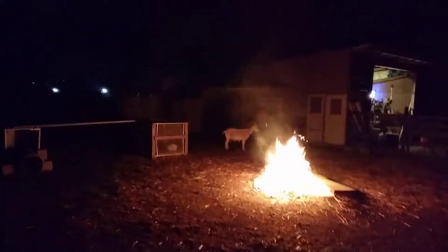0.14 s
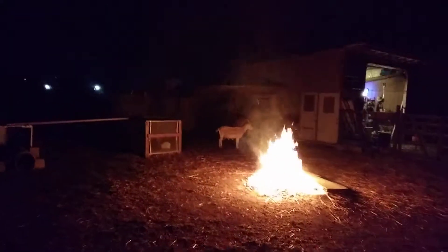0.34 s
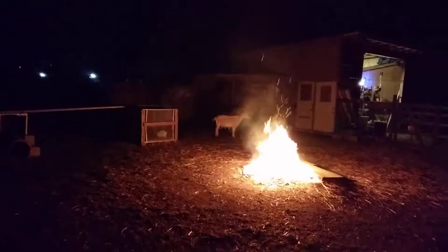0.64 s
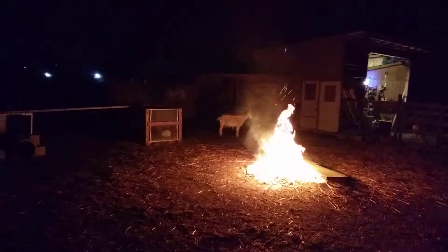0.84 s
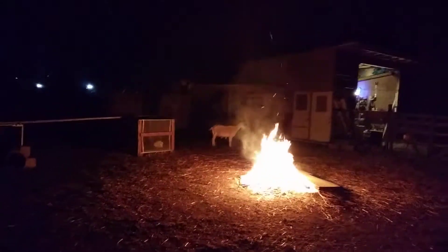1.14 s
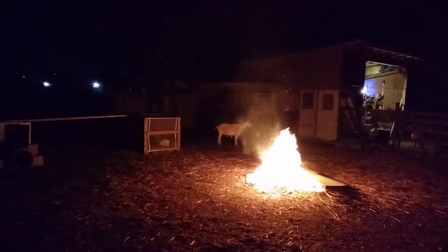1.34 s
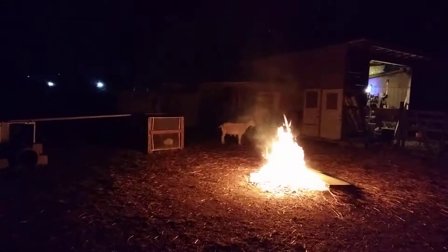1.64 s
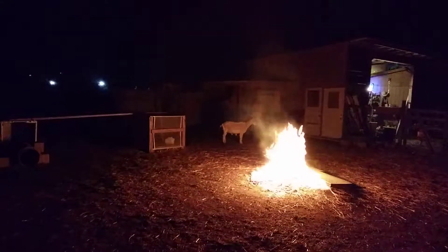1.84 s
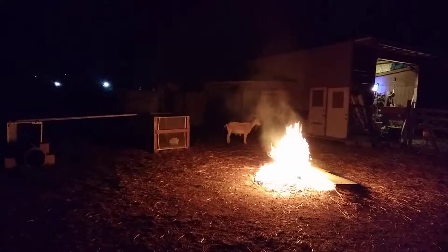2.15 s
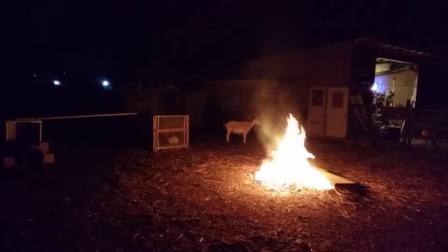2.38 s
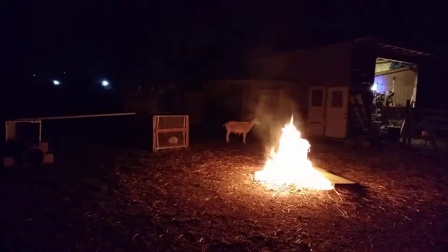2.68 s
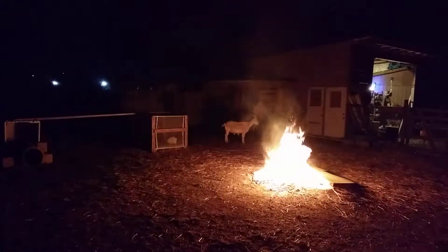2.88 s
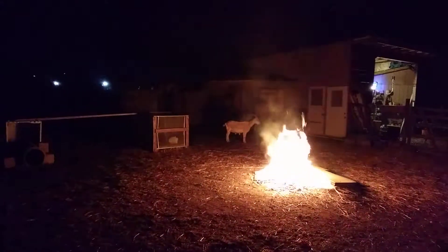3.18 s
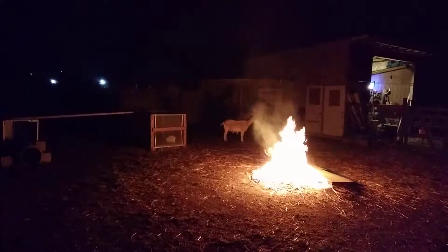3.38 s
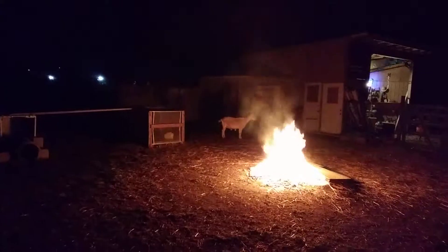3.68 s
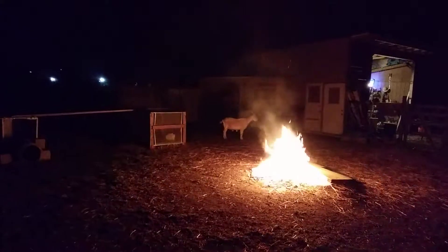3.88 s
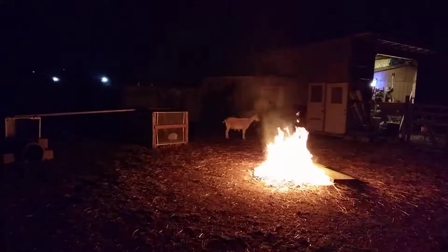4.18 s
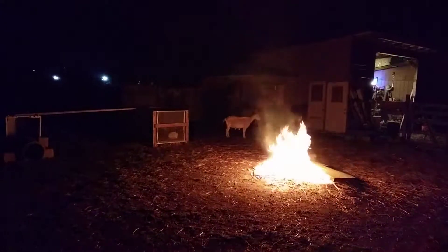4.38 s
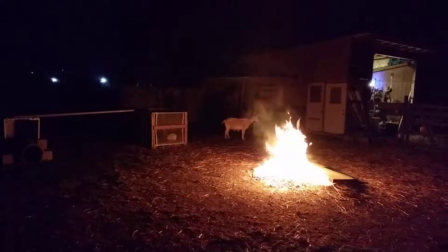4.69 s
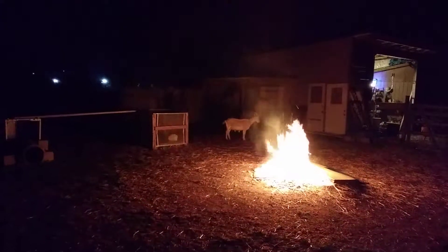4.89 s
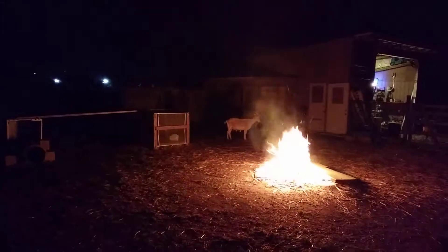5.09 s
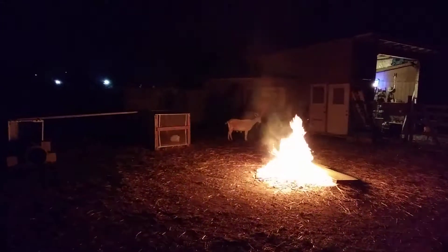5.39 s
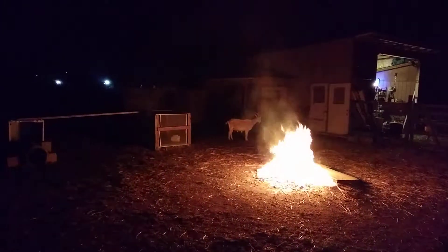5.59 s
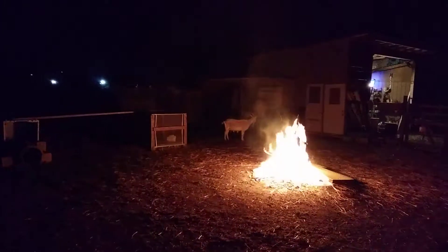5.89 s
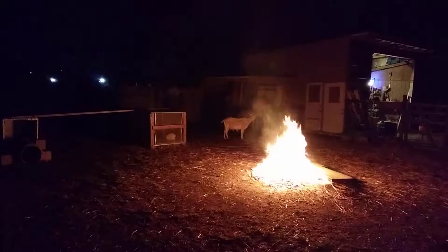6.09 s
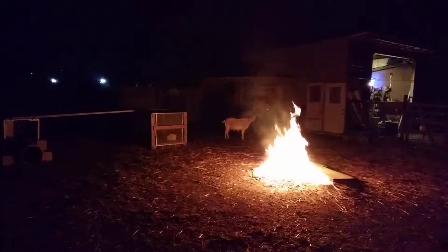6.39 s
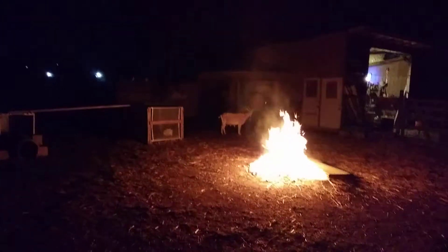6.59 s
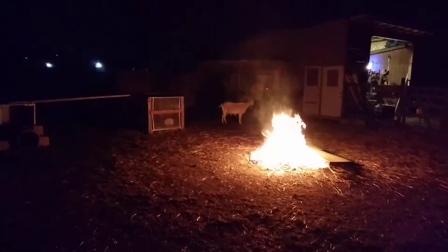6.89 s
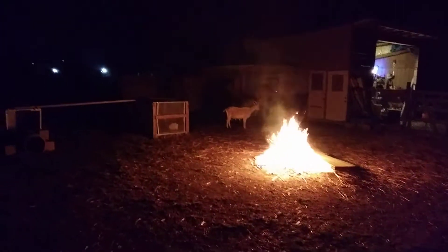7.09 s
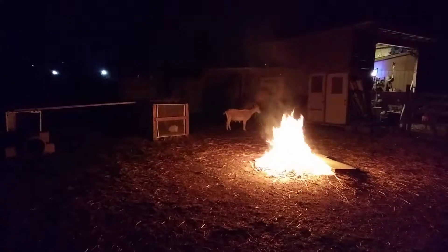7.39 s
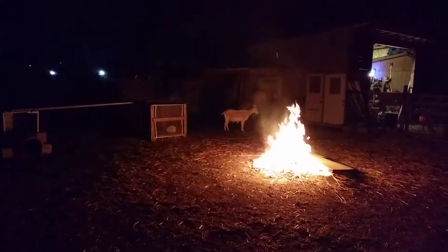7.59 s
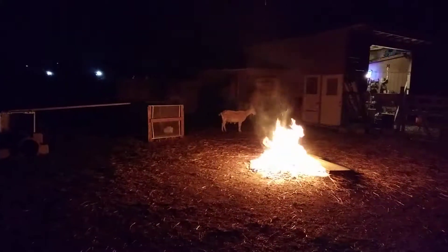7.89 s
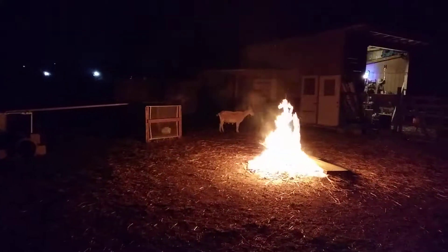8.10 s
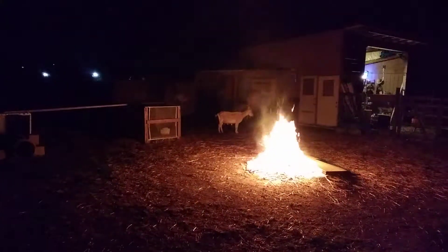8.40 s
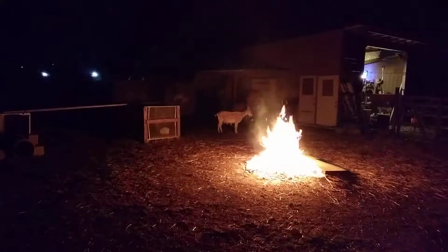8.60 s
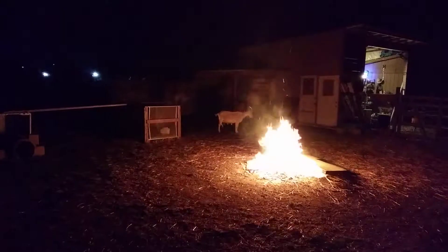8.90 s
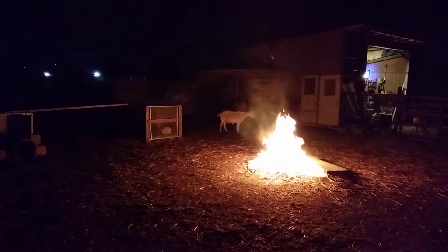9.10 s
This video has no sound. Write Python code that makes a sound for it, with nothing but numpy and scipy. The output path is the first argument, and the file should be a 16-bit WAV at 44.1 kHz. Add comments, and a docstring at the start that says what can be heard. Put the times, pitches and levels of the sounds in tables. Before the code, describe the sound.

A wood bonfire crackles at night with sharp scattered pops, straw scrunching close by at first, crickets chirping steadily and a goat bleating softly once.

```python
"""A wood bonfire at night in a farmyard, some metres from a phone microphone; a soft flame roar, a far road and drone.
From the start straw scrunches close by for a second: dense stalk breaks. Wood pops and ticks (rung noise bursts) go on
throughout, as do one cricket's chirps (sagging tones) before a far chorus (narrow noise). From 2.2 s embers crumble
and, at 2.6 s, sap first whistles (gliding tones); at 5.3 s a goat bleats softly (gliding tones with a faint octave);
the sap whistles again from 6.4 s and the loudest pop comes at 7.75 s."""
import sys
import numpy as np
from scipy import signal
from scipy.fft import rfft, irfft
from scipy.io import wavfile
from scipy.ndimage import uniform_filter1d

SR = 44100
rng = np.random.default_rng(int(sys.argv[2]) if len(sys.argv) > 2 else 0)


def generate_wav(sig):
    """Save sig (samples, or channels by samples) to the path in sys.argv[1] as 16-bit PCM at SR."""
    pcm = np.round(np.clip(np.atleast_2d(sig).T, -1, 1) * 32767).astype(np.int16)
    wavfile.write(sys.argv[1], SR, pcm)


N = 407925

# background levels: (time [s], flame roar level [dB], far road level [dB], wavering drone level [dB])
BACKGROUND_LEVELS = [(0, -62.5, -65, -68), (1.3, -64.5, -69.5, -72.5), (2.001, -67.5, -70.5, -75),
                     (2.6, -65.5, -68.5, -77.5), (3, -66.5, -71, -63.5), (3.5, -68, -70, -71.5),
                     (4.2, -67, -68, -72), (4.8, -66.5, -68, -74), (5.2, -64.5, -65.5, -75),
                     (5.8, -66, -66.5, -69), (6.299, -65.5, -63.5, -66.5), (6.8, -65.5, -61, -62.5),
                     (7.298, -67.5, -60.5, -72), (7.799, -66, -58, -66), (8.3, -66.5, -62, -70),
                     (8.8, -66, -62.5, -72), (9.25, -67, -62.5, -73)]
# colour of the flame noise: (frequency [Hz], relative level per Hz [dB])
FLAME_COLOUR = [(15, -66), (25, -48), (128, -21.5), (167, -13.5), (349, -2.5), (445, -5.5), (651, 3.5),
                (927, -4), (1220, -14), (1930, -7), (3410, -17), (4600, -10.5), (5270, -16), (15200, -20),
                (16500, -25)]
# resonances of the far road: (centre [Hz], width [Hz], relative level [dB])
ROAD_MODES = [(721, 93, -7), (1235, 405, 1.5), (1765, 235, -6.5)]
# resonances of the drone: (centre [Hz], width [Hz], relative level [dB])
DRONE_MODES = [(1032, 121, -1.5), (2156, 280, -5.5), (2700, 510, -11.5)]
# far crickets: (centre [Hz], width [Hz], level [dB])
CHORUS_MODES = [(4184, 180, -80), (4870, 430, -86.5)]
# near cricket: (first wing stroke [s], first to last stroke [s], base level [dB])
CRICKET_CHIRPS = [(.203, .13, -68), (.579, .13, -68), (.942, 0.13, -64), (1.311, .136, -66.5),
                  (1.697, 0.12, -66.5), (2.059, .132, -66), (2.431, .14, -63), (2.809, .132, -64),
                  (3.168, .136, -64.5), (3.536, .128, -66.5), (3.893, 0.13, -67), (4.334, .138, -63.5),
                  (4.713, 0.13, -63.5), (5.126, .142, -62.5), (5.541, .134, -63), (5.906, .132, -63),
                  (6.235, .122, -66), (6.601, .132, -66), (6.977, .132, -62), (7.352, 0.13, -63.5),
                  (7.782, .132, -60), (8.15, 0.14, -62), (8.572, 0.13, -64.5), (9.151, .132, -62)]
# goat syllables: (start [s], length [s], first pitch [Hz], last pitch [Hz], level [dB])
GOAT_SYLLABLES = [(5.283, .07, 718, 735, -58), (5.405, 0.054, 728, 710, -58),
                  (5.512, 0.054, 750, 730, -50.5), (5.556, 0.06, 735, 786, -54),
                  (5.665, 0.06, 753, 677, -52), (5.74, 0.07, 733, 720, -54),
                  (5.805, 0.058, 730, 715, -50.5), (5.855, 0.058, 710, 660, -54.5)]
# sap whistling out of a log: (start [s], length [s], first pitch [Hz], last pitch [Hz], level [dB])
SAP_WHISTLES = [(2.62, .08, 7950, 7050, -81), (2.73, .13, 7450, 7900, -79), (6.375, .185, 7350, 8050, -76),
                (6.645, 0.17, 10700, 11700, -80), (6.86, .045, 9900, 10000, -77),
                (6.905, .115, 10000, 7150, -77)]
# thump, knock, snap and fizz of a crunch: (nominal low edge [Hz], nominal high edge [Hz])
CRUNCH_BANDS = [(400, 1500), (1500, 4300), (4300, 9000), (9000, 15500)]
# straw close by, one list per scrunch: (time [s], thump level [dB], snap against thump [dB])
STRAW_SCRUNCHES = [
    [(0.12, -54, -9), (0.156, -64, -14), (0.166, -37, -3.5), (0.178, -37, -1), (0.202, -34.5, 6.5),
     (0.246, -50, 1.5), (0.298, -54.5, 1.5), (0.32, -71, -10)],
    [(0.375, -65, -21), (0.381, -58, 4.5), (0.397, -58, 4), (0.445, -43, -3), (0.463, -44.5, 2.5),
     (0.503, -46.5, 6), (0.515, -39, 0)],
    [(0.515, -40, 1.5), (0.557, -26, -12), (0.585, -27, -7), (0.643, -41, -4), (0.691, -42.5, -8),
     (0.697, -48, -14), (0.797, -61, -5), (0.81, -68, -19)],
    [(0.83, -75, -13), (0.838, -51.5, -15), (0.858, -55, -7), (0.874, -50, -13), (0.88, -55, -1.5),
     (0.904, -50.5, -4), (0.936, -58.5, -5), (0.95, -64, 5)],
    [(1.06, -64, -12), (1.078, -50, -4), (1.118, -45.5, -7.5), (1.138, -49, -13), (1.146, -55.5, -10),
     (1.16, -56, -22)],
]
# embers crumbling and settling: (start [s], length [s], thump level [dB], knock against thump [dB],
# snap against thump [dB], fade over the length [dB])
EMBER_FALLS = [(2.196, 0.055, -51.5, -21, -11.5, 7.4), (2.325, 0.023, -47.5, -6.5, -12, 25),
               (2.356, 0.056, -51.5, -17, -14, 14), (2.436, 0.02, -41, -26, -8, 27),
               (2.599, 0.017, -45.5, -15, -6, 25), (2.615, .025, -55.5, -8, -11, 10),
               (4.116, 0.077, -54, -4.5, -5, 14), (5.05, .08, -58, -9, -9, 3),
               (5.75, 0.042, -57.5, -8, -11, 2), (6.82, .026, -36, -9.5, -13.5, 5.4),
               (7.757, 0.01, -27, -12, -14, 24), (7.77, .016, -37.5, 5, 1.5, 9),
               (7.786, .03, -49, 6.5, -7, 6), (7.812, 0.17, -52, 8, -0.5, 28)]
# bursting pockets in the wood: (time [s], thump [Hz], thump peak [dB], knock peak [dB], snap peak [dB],
# sharpness factor)
WOOD_POPS = [(0.1119, 880, -25.5, -24, -48, 0.49), (0.1679, 1240, -14.5, -38, -44, 0.67),
             (0.2002, 1210, -22, -14.5, -29, 0.82), (0.6862, 1120, -24, -21, -21, 0.63),
             (0.821, 990, -40, -60, -48, 1.3), (1.1462, 1410, -40, -31, -29, 0.66),
             (1.2056, 940, -41.5, -52, -65, 0.7), (2.199, 1110, -40, -46, -42, 0.82),
             (2.2148, 1500, -36.5, -54, -53, 0.69), (2.3221, 890, -38, -59, -60, 0.79),
             (2.3275, 990, -45, -57, -49, 1), (2.3579, 1170, -52, -55, -48, 1),
             (2.3677, 1040, -40.5, -48, -59, 0.72), (2.432, 820, -24.5, -58, -44, .8),
             (2.557, 910, -33.5, -46, -41.5, 0.73), (2.5979, 980, -32.5, -50, -44, 0.76),
             (3.3195, 835, -21.5, -22.5, -23.5, 0.73), (3.639, 510, -44.5, -60, -64, 0.89),
             (3.66, 2160, -65, -43, -67, 2.3), (3.715, 610, -46, -68, -71, 0.98),
             (3.826, 765, -38.5, -70, -55, .8), (4.115, 1210, -37.5, -55, -37, 0.45),
             (4.3225, 725, -26.5, -49, -39.5, 0.82), (4.3683, 610, -31.5, -58, -48, 0.69),
             (4.4898, 1750, -40, -40, -33, 0.8), (4.4923, 760, -27.5, -52, -39, 0.57),
             (5.615, 1500, -39, -38, -51, 1.3), (5.753, 1110, -49, -61, -62, 1.2),
             (5.7628, 860, -56, -58, -56, 1.6), (5.778, 1220, -52, -49, -54, 1.3),
             (5.948, 1700, -52, -46.5, -70, 0.98), (6.24, 1610, -54, -47.5, -49, 1.4),
             (6.8189, 1020, -23, -17, -31.5, 0.54), (7.753, 1540, -11.5, -12.5, -21.5, 1.4),
             (7.773, 2150, -25.5, -21.5, -40, 4.8), (7.807, 1700, -50, -32, -55, 2),
             (7.8156, 1720, -48, -29, -45, 1.8), (7.8221, 1900, -35, -27.5, -57, 1.2),
             (7.844, 660, -47, -32.5, -58, 1.4), (8.8577, 460, -70, -36.5, -41.5, 2.45)]
# thin ticks of bark and sparks, without thump: (time [s], snap peak [dB], snap [Hz], knock peak [dB])
BARK_TICKS = [(0.13, -50, 6580, -40), (0.9502, -38.5, 10600, -54), (1.0241, -36.5, 7550, -59),
              (1.3364, -54, 8230, -64), (1.532, -49, 6730, -51), (1.7335, -45, 7000, -63),
              (2.0018, -46, 10500, -54), (2.103, -38, 7900, -66), (2.1913, -37, 7500, -53),
              (2.2832, -48, 8080, -63), (2.4435, -39, 9840, -60), (2.4845, -47, 7540, -61),
              (2.7244, -48, 7470, -69), (2.8574, -46, 7560, -61), (2.8873, -45.5, 7800, -61),
              (3.3957, -46, 7630, -67), (3.6002, -50, 9210, -63), (4.0721, -40.5, 7800, -65),
              (4.122, -39, 6470, -53), (4.172, -36.5, 7430, -47), (4.4248, -44, 7520, -55),
              (4.4374, -44, 6750, -44), (4.507, -46, 7380, -54), (4.5715, -50, 8010, -62),
              (4.7895, -51, 7660, -54), (5.1851, -50, 8000, -63), (5.2107, -49, 10200, -58),
              (5.3787, -46.5, 7340, -58), (5.4736, -45, 7260, -68.5), (5.9359, -52, 6840, -61),
              (6.0273, -51, 6500, -52), (6.639, -45.5, 7640, -64), (6.8447, -36, 11500, -59),
              (7.031, -46, 7890, -55), (7.0522, -42, 7700, -47), (7.137, -48, 6990, -69),
              (7.1881, -50, 10200, -66), (7.341, -40, 10600, -51), (7.3851, -49, 11000, -62),
              (7.5832, -41.5, 7350, -53), (7.6141, -41, 7500, -69), (8.1494, -43, 9540, -54),
              (8.1798, -50, 8330, -60), (8.243, -42, 7200, -58), (8.2816, -48, 7540, -62),
              (8.4173, -54, 7110, -69), (8.8172, -43, 6840, -50), (9.1671, -47, 11200, -61)]
# thump, knock and snap rings of the wood: (base sharpness Q)
RING_Q = [1.2, 1.8, 1.4]

# near cricket: first and last stroke of a chirp
STROKE_COUNT = 6
STROKE_HZ, STROKE_MS, STROKE_DB = (4640, 4730), (14.5, 16), (0.6, 5)
STROKE_SAG_HZ = 130
SLOWING = 0.2  # the strokes space out
# straw and embers
STRAW_KNOCK_DB, STRAW_KNOCK_SLOPE = -2.9, 0.43  # knock against thump; dB per dB of snap
FIZZ_DB = -16  # against the snap
STRAW_DULLING, STRAW_SOFT_DB = 0.44, -37  # fizz dB lost per dB of thump above this level
# pops and ticks
KNOCK_HZ, SNAP_HZ, TICK_KNOCK_HZ = 4430, 8120, 4200
TEAR_MS = 0.75  # times the sharpness: a pop tears longer the sharper it rings
TICK_TEAR_MS, TICK_SHARP = 0.45, 1.37
THUD_HZ, THUD_MS, THUD_DB = 296, 3.5, -23  # level against the thump, before damping
TOP_HZ = 16000  # reach of the microphone


def undb(db):
    """Amplitude of a level in dB."""
    return 10 ** (np.asarray(db) / 20)


def unit(x):
    """Scale a sound to an RMS of one."""
    return x / np.sqrt(np.mean(x ** 2))


def band(x, lo_hz, hi_hz, order=2):
    """Keep the band between two frequencies."""
    return signal.sosfilt(signal.butter(order, [lo_hz, hi_hz], "band", fs=SR, output="sos"), x)


def highpass(x, hz, order):
    """Remove the bass below a frequency."""
    return signal.sosfilt(signal.butter(order, hz, "high", fs=SR, output="sos"), x)


def walk(rate):
    """Random levels held 1 / rate s and slewed twice; spread near 1."""
    hold = int(SR / rate)
    steps = np.repeat(rng.standard_normal(N // hold + 1), hold)
    slewed = uniform_filter1d(uniform_filter1d(steps, hold), hold)
    return np.sqrt(11 / 6) * slewed[:N]


def rows(table):
    """Sample indices that a curve spans and its columns there."""
    s, *columns = np.transpose(table)
    i = np.arange(int(s[0] * SR), min(int(s[-1] * SR), N))
    return i, [np.interp(i / SR, s, column) for column in columns]


def swelling(modes, depth_db, rate):
    """Noise in a few resonances, each wavering alone."""
    out = np.zeros(N)
    for hz, width, db in modes:
        noise = unit(band(rng.standard_normal(N), hz - width / 2, hz + width / 2))
        out += undb(db + depth_db * walk(rate)) * noise
    return out


def glides(notes, waver, second_db, edge_s):
    """Unsteady tones, each with an octave partial, that slide in pitch, swell and fade."""
    out, shake, flutter = np.zeros(N), walk(65), walk(40)
    for start, length, first_hz, last_hz, db in notes:
        i, (hz,) = rows([(start, first_hz), (start + length, last_hz)])
        phase = 2 * np.pi * np.cumsum(hz * (1 + waver * shake[i])) / SR
        edge = np.minimum(1, np.minimum(i - i[0], i[-1] - i) / (edge_s * SR))
        tone = np.sin(phase) + undb(second_db) * np.sin(2 * phase)
        out[i] += np.sqrt(2) * edge * undb(db + 1.8 * flutter[i]) * tone
    return out


def far_road(level_db):
    """Far road: noise in broad resonances that waver slowly under a drawn level."""
    return swelling(ROAD_MODES, 1.3, 6) * undb(level_db)


def drone(level_db):
    """Wavering drone: noise in resonances that swell apart from one another."""
    return swelling(DRONE_MODES, 2.2, 8) * undb(level_db)


def flames(roar_db):
    """Flame roar: coloured noise in overlapping octave bands that flicker alone."""
    hz = np.maximum(np.arange(N // 2 + 1) * SR / N, 1)
    colour_hz, colour_db = np.transpose(FLAME_COLOUR)
    colour = undb(np.interp(np.log(hz), np.log(colour_hz), colour_db))
    noise = rfft(rng.standard_normal(N)) * colour
    scale = np.std(irfft(noise * (hz > 300) * (hz < 900), N))  # levels refer to this band
    out = np.zeros(N)
    for centre in 2 ** np.arange(4.5, 14.6, 1.):
        share = np.cos(np.pi / 2 * np.clip(np.log2(hz / centre), -1, 1)) ** 2
        follow = np.clip(1.3 - centre / 6000, 0, 1)  # the hiss stays even while the roar swells
        db = follow * roar_db + (1 - follow) * roar_db.min() + (.4 + follow) * walk(9)
        out += undb(db) * irfft(noise * share, N) / scale
    return out


def background():
    """Flames, far road and drone, each along its own level curve."""
    s, *columns = np.transpose(BACKGROUND_LEVELS)
    roar_db, road_db, drone_db = (np.interp(np.arange(N) / SR, s, c) for c in columns)
    return flames(roar_db) + far_road(road_db) + drone(drone_db)


def far_chorus():
    """Many far crickets blur into narrow bands of quickly fluttering noise."""
    return swelling(CHORUS_MODES, 3.6, 70)


def cricket():
    """Each wing stroke is a short tone sagging in pitch; strokes space out and rise in pitch and level."""
    out = np.zeros(N + SR)
    chance = rng.standard_normal((len(CRICKET_CHIRPS), STROKE_COUNT, 2))
    along = np.linspace(0, 1, STROKE_COUNT)
    place = along * (1 - SLOWING * (1 - along))
    stroke_hz, stroke_ms, stroke_db = (np.interp(along, [0, 1], ends) for ends in (STROKE_HZ, STROKE_MS, STROKE_DB))
    strokes = list(zip(place, stroke_hz, stroke_ms, stroke_db))
    for (first, length, db), luck in zip(CRICKET_CHIRPS, chance):
        for (s, hz, ms, rel_db), (pitch_luck, level_luck) in zip(strokes, luck):
            u = np.linspace(0, 1, int(ms / 1000 * SR))
            pitch = hz + 12 * pitch_luck - STROKE_SAG_HZ * u ** 1.15
            tone = np.sin(2 * np.pi * np.cumsum(pitch) / SR)
            swell = np.abs(np.sin(np.pi * u)) ** 0.44
            i = int((first + s * length) * SR)
            out[i:i + len(u)] += undb(db + rel_db + 2.2 * level_luck) * swell * tone
    return out[:N]


def goat():
    """Soft bleat: short voiced syllables of gliding pitch with a faint octave."""
    return glides(GOAT_SYLLABLES, 0.0055, -28, 0.016)


def sap():
    """Sap whistling out of a log: high, almost pure tones that glide."""
    return glides(SAP_WHISTLES, 0.0088, -60, 0.014)


def stalk_breaks(per_s=3500, spread_db=2.0):
    """Dense breaks of uneven size, shared by all four bands; each band leans towards its low edge."""
    size = undb(spread_db * rng.exponential(size=N)) * (rng.random(N) < per_s / SR)
    breaks = signal.lfilter([1], [1, -.95], size)
    lean = signal.lfilter([1], [1, -.6], breaks * rng.standard_normal((len(CRUNCH_BANDS), N)))
    parts = np.array([unit(band(x, .85 * lo, 1.1 * hi)) for x, (lo, hi) in zip(lean, CRUNCH_BANDS)])
    parts[0] = unit(highpass(parts[0], 520, 2))  # thin stalks
    return parts


def straw(parts):
    """Straw scrunched close by: stalk breaks whose knock follows the brightness and whose fizz dulls when hard."""
    out = np.zeros(N)
    for scrunch in STRAW_SCRUNCHES:
        i, (db, snap) = rows(scrunch)
        knock = STRAW_KNOCK_DB + STRAW_KNOCK_SLOPE * snap
        fizz = snap + FIZZ_DB - STRAW_DULLING * (db - STRAW_SOFT_DB)
        out[i] += np.sum(parts[:, i] * undb(db + np.array([0 * db, knock, snap, fizz])), axis=0)
    return out


def embers(parts):
    """Embers crumbling and settling: brief runs of the same dense breaks that fade evenly in dB."""
    out = np.zeros(N)
    for start, length, db, knock, snap, fade_db in EMBER_FALLS:
        i, (level_db,) = rows([(start, db), (start + length, db - fade_db)])
        out[i] += undb([0, knock, snap, snap + FIZZ_DB]) @ parts[:, i] * undb(level_db)
    return out


def thuds():
    """Every pop pushes the air once: a low, quickly damped swing."""
    s, _, db = np.array(WOOD_POPS)[:, :3].T
    kicks, t = np.zeros(N), np.arange(1024) / SR
    kicks[(s * SR).astype(int)] = undb(db + THUD_DB)
    swing = np.sin(2 * np.pi * THUD_HZ * t) * np.exp(-1000 * t / THUD_MS)
    return highpass(np.convolve(kicks, swing)[:N], 175, 3)


def bursts(start_s, ring_hz, peak_db, tear_ms, sharp, tail_db=-22, tail_ms=8.9):
    """A click and a brief tearing noise ring the wood, with a short splintering tail."""
    out, t = np.zeros(N + 2048), np.arange(2048) * 1000 / SR  # t in ms
    noise = rng.standard_normal((len(start_s), 2048))
    tear = np.exp(-t / np.clip(tear_ms, .05, 3)[:, None])
    push = noise * (tear + undb(tail_db) * np.exp(-t / tail_ms))
    push[:, 0] = 3.23  # the click
    spectrum = rfft(push)
    at = (np.asarray(start_s) * SR).astype(int)[:, None] + np.arange(2048)
    hz = np.arange(1, 1026) * SR / 2048
    for k, q in enumerate(RING_Q):
        ratio = hz / ring_hz[:, k:k + 1]
        resonance = (1 + 1j * q * sharp[:, None] * (ratio - 1 / ratio)) ** 2
        # neighbouring rings swing in opposite sense
        ring = (-1) ** k * irfft(spectrum / resonance / (1 + 1j * hz / 14000))
        ring = ring / np.abs(signal.hilbert(ring[:, :256])).max(axis=1, keepdims=True)
        np.add.at(out, at, ring * undb(peak_db[:, k:k + 1]))
    return out[:N]


def faint_ticks():
    """A random rain of faint ticks, many soft and a few louder."""
    draw = rng.random((170, 8))
    ring_hz = np.array([600, 2500, 6500]) * 2 ** draw[:, 4:7]
    peak_db = np.array([-66, -70, -64]) - 5.6 * np.log(draw[:, 1:4] + 0.15)
    return bursts(draw[:, 0] * N / SR, ring_hz, peak_db, draw[:, 7], 1.0 + draw[:, 7])


def bark_ticks():
    """Thin ticks of bark and sparks: a knock and a snap without thump."""
    s, snap_db, snap_hz, knock_db = np.array(BARK_TICKS).T
    same = np.ones(len(s))
    ring_hz = np.c_[1000 * same, TICK_KNOCK_HZ * same, snap_hz]
    peak_db = np.c_[-np.inf * same, knock_db, snap_db]  # the thump is silent
    return bursts(s, ring_hz, peak_db, TICK_TEAR_MS * same, TICK_SHARP * same)


def wood_pops():
    """Bursting pockets in the wood ring as thump, knock and snap."""
    pop = np.array(WOOD_POPS)
    same, sharp = np.ones(len(pop)), pop[:, 5]
    ring_hz = np.c_[pop[:, 1], KNOCK_HZ * same, SNAP_HZ * same]
    return bursts(pop[:, 0], ring_hz, pop[:, 2:5], TEAR_MS * sharp, sharp)


def scene():
    """Farmyard behind, animals and sap between, straw and bonfire in front."""
    animals = far_chorus() + cricket() + goat()
    parts = stalk_breaks()
    crackle = straw(parts) + embers(parts) + faint_ticks() + bark_ticks() + wood_pops()
    # small sticks and stalks radiate little bass
    near = highpass(crackle, 260, 3) + thuds()
    return (background() + animals + sap() + near)[None]


def record(dry):
    """The phone microphone cuts the top."""
    return signal.sosfilt(signal.ellip(8, .2, 70, TOP_HZ, fs=SR, output="sos"), dry)


dry = scene()
out = record(dry)
generate_wav(out)
```